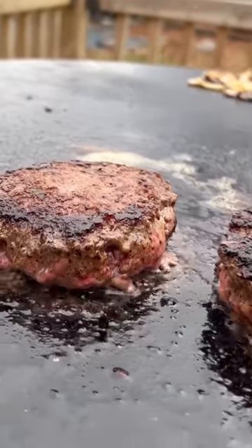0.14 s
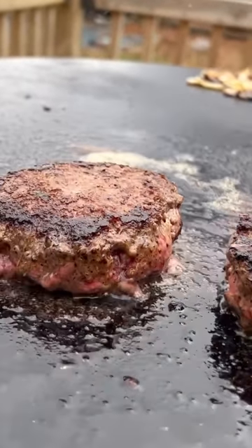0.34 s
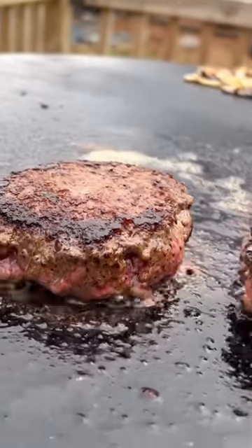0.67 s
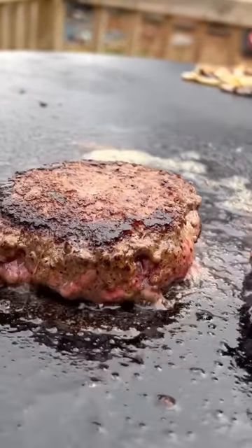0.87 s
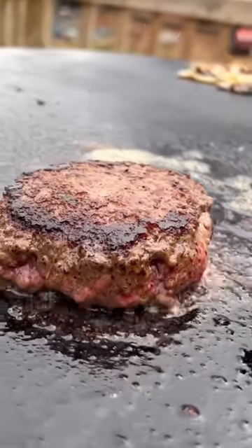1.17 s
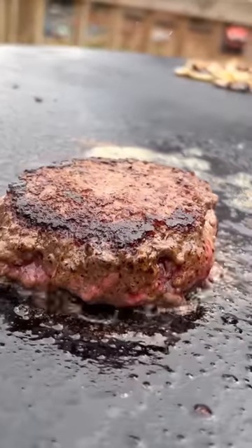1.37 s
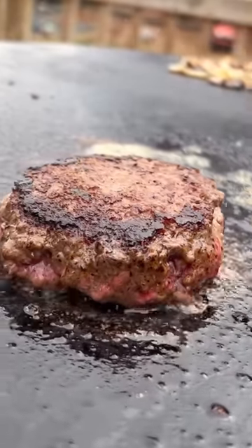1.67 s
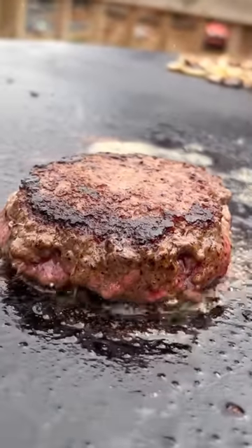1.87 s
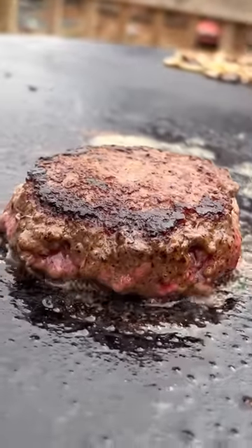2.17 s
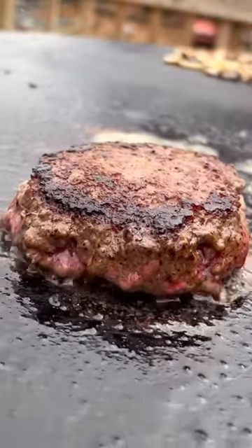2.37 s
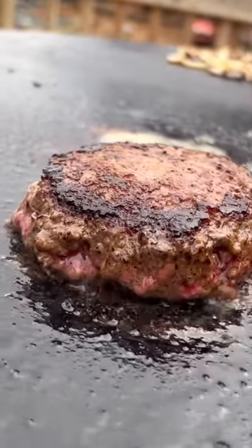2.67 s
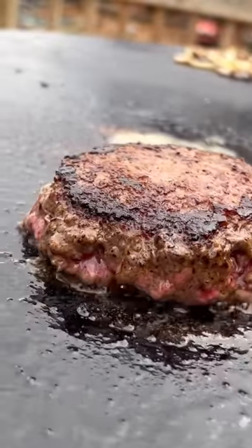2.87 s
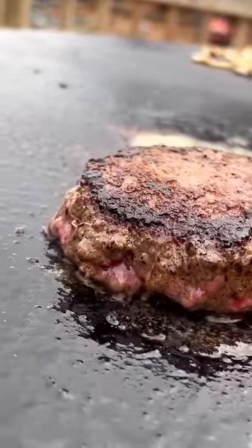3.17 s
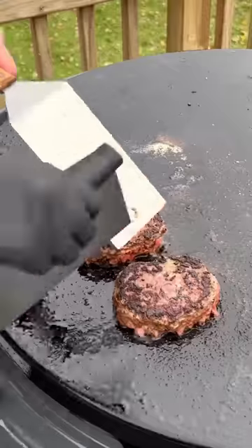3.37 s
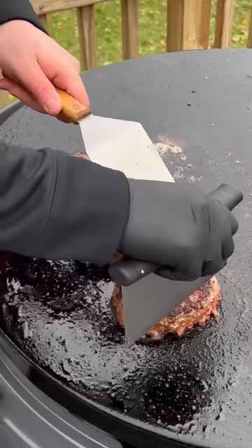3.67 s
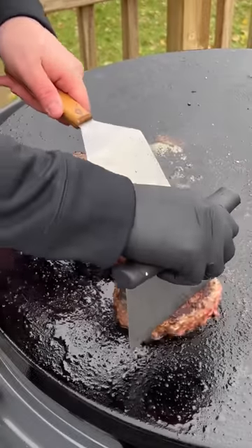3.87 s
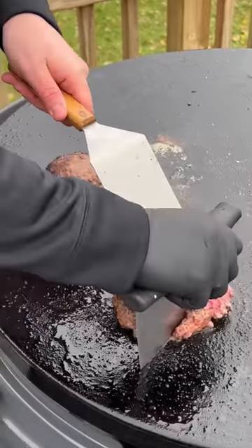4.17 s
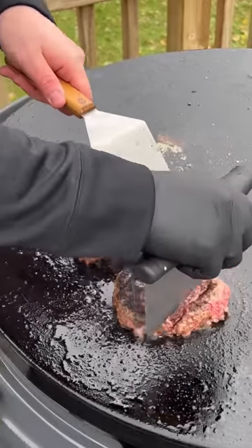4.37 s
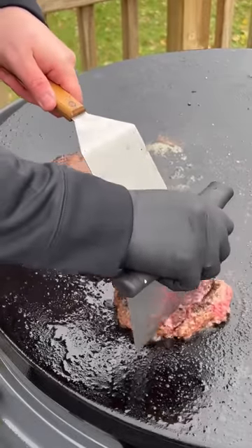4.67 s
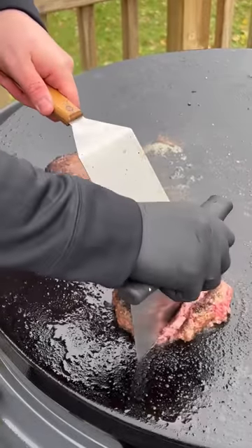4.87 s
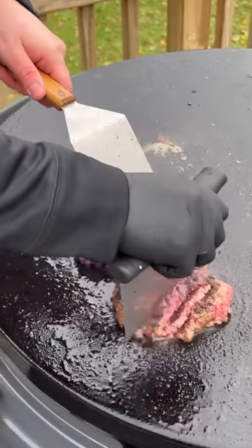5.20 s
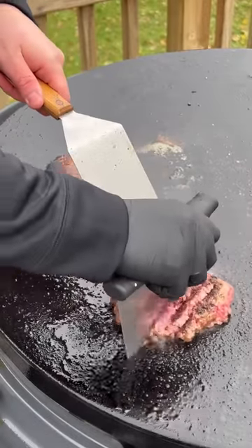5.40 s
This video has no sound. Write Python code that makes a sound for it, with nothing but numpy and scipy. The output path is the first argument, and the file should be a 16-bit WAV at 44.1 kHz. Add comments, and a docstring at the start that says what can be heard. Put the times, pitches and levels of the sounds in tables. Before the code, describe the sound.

Burger patties sizzle and spit loudly up close outdoors in gusty wind, then the sizzle drops farther off as a metal spatula scuffs and knocks the griddle.

```python
"""Burgers sizzle on a steel griddle outdoors, crackling and spitting very near the microphone at first.
The sizzle is dense random bubble bursts and hiss; bigger bubbles pop and plop, and fat droplets tick.
Gusts of low turbulence swell throughout, with eddies puffing and thumping at the microphone.
From about 3.3 s the sizzle drops back, heard from farther above, then turns to an even hiss as meat is pressed.
A spatula scuffs and ticks the plate near 4 s and knocks near 5.4 s: noise clank over decaying plate modes."""
import sys
import numpy as np
from scipy import signal
from scipy.fft import rfft, irfft
from scipy.io import wavfile
from scipy.ndimage import uniform_filter1d, minimum_filter1d

SR = 44100
rng = np.random.default_rng(int(sys.argv[2]) if len(sys.argv) > 2 else 0)


def dump(signal):
    """Clip the signal to [-1, 1] and save it as 16-bit WAV at the path in sys.argv[1]."""
    limited = np.clip(np.atleast_2d(signal).T, -1, 1)
    pcm = np.round(limited * 32767).astype(np.int16)
    wavfile.write(sys.argv[1], SR, pcm)


N = 244314
TIME = np.arange(N) / SR
HZ = np.fft.rfftfreq(N, 1 / SR)
SHARED = np.array([[1], [0]])  # a sound has two rows: what both ports hear, and what only the right one hears
EDGE_HZ = 15900  # upper band limit

# low turbulence of the breeze: (frequency [Hz], relative density [dB per Hz])
RUMBLE_COLOUR = [(20, -13), (35, -10.5), (55, -0.5), (75, -1), (130, -7), (200, -13.5), (400, -30),
                 (900, -38)]
# ragged turbulence of gusts and eddies: (frequency [Hz], relative density [dB per Hz])
EDDY_COLOUR = [(30, -11), (70, -1), (130, -1.5), (290, -0.5), (450, -7.5), (700, -14), (1200, -26),
               (2500, -79)]
# gusts swell and die away above a light steady air:
# (time of the crest [s], level before trims [dB], rise [s], fall [s])
GUST_CRESTS = [(0.46, -39.5, .1, 0.22), (0.73, -34.5, 0.087, .03), (1.68, -51, .12, .05),
               (1.98, -24.5, 0.051, 0.094), (2.15, -33, 0.09, 0.27), (2.82, -32, .02, .08),
               (2.91, -30.5, 0.04, 0.096), (3.24, -27.5, 0.063, 0.17), (3.92, -34, 0.12, .2),
               (4.24, -32, .02, 0.063), (4.4, -28, .1, .03), (4.57, -28.5, 0.084, 0.17),
               (4.93, -33, 0.095, 0.077), (5.14, -31.5, 0.15, 0.087), (5.29, -28, 0.054, .13),
               (5.499, -31, 0.034, 0.014)]
CALM_DB = -45.5  # the steady air between gusts, before trims
GUST_SHAPE = 1.58  # flanks of a gust, from pointed (1) to rounded (2)
# the hardest eddies: (time [s], size before trims [dB], thump relative to size before trims [dB], thump pitch [Hz])
HARD_EDDIES = [(1.953, -22.5, 3, 181), (1.984, -28, 0, 83), (2.108, -18, -5, 103), (2.195, -20, -11, 102),
               (2.429, -19, -19, 70), (2.902, -28, -1, 90), (2.963, -36, 8, 95), (3.201, -20.5, -12, 94),
               (3.23, -13, -9, 89.5), (3.258, -26, -12, 71), (3.735, -27, -3, 113), (3.905, -23, -7, 151),
               (4.218, -25.5, -5, 129), (4.278, -28, -17, 59), (4.39, -25.5, -9, 62),
               (4.555, -21, -25, 127), (4.581, -21.5, -9, 191), (4.645, -20, -22, 98),
               (4.864, -27, -14, 116), (5.133, -20, -8, 118), (5.166, -19, -23, 116),
               (5.23, -18.5, -24, 200), (5.241, -27, 9, 60.4)]
# lesser eddies ride on the gusts: how many a second, their size above the breeze and its scatter [dB]
EDDIES_PER_S, EDDY_DB, EDDY_SPREAD_DB = 17, -2, 0.5
# the thump of a lesser eddy: relative to its size before trims [dB], pitch [Hz], scatter of pitch [octaves]
THUMP_DB, THUMP_HZ, THUMP_SCATTER = -8, 131, 0.33
# the spatula meets the plate: (time [s], force [dB], fade time of the scuff [s])
SPATULA_KNOCKS = [(4.029, -10, 0.016), (4.05, -14.5, 0.065), (5.374, 3.5, .006), (5.377, 0, 0.0045),
                  (5.381, 1, 0.0026), (5.389, 3, 0.0036)]
# ringing of the plate and blade: (frequency [Hz], relative level [dB], t60 [s])
PLATE_MODES = [(487, 7.5, 0.32), (634, -1, 0.25), (681, 8, 0.23), (850, -1, 0.26), (991, 0, 0.3),
               (1162, 7, 0.3), (1277, 12.5, 0.42), (1350, 1, 0.17), (1482, 2, .3), (1660, 5, 0.26),
               (1660, 3, 0.3), (1717, 7.5, 0.33), (2350, 2, 0.34), (2640, 6.5, 0.32)]
# the dense, quickly damped clank of a blow: (frequency [Hz], relative density [dB per Hz])
CLANK_COLOUR = [(200, -5), (380, -13.5), (500, 1), (1100, 2.5), (1800, 1.5), (2600, -6.5), (3000, -7.5),
                (3400, -18), (7000, -21), (14000, -54)]
# the thin blade ticks against the plate: (time [s], ring level [dB], pitch [Hz], t60 [s])
BLADE_CONTACTS = [(4.222, -13.5, 2730, 0.013)]
# droplets of fat explode with a very sharp tick: (time [s], size before trims [dB])
FAT_SPITS = [(0.067, 2), (0.114, 3.5), (0.1315, -2.5), (.182, -2), (0.233, -2), (0.5728, -4), (0.714, 2),
             (0.745, 0.5), (1.506, -3.5), (1.727, -1.5)]
# the loudest bubbles: (time [s], size before trims [dB], ring pitch [Hz], plop relative to size before trims [dB])
BIG_BUBBLES = [(0.181, -7, 2340, -11), (0.355, -10, 4960, -26), (0.467, -10, 2940, -12),
               (0.592, -3.5, 2370, -22), (0.745, -3.5, 2860, -20), (0.765, -7.5, 5620, -22),
               (0.879, -8, 4900, -11), (0.922, -4, 2570, -20), (1.319, -11.5, 4690, -15),
               (1.366, -10, 4500, -14), (1.413, -7, 4660, -20), (1.49, -7.5, 4330, -22),
               (1.707, -13, 2830, -7), (1.719, -4, 4950, -30), (2.389, -9, 4500, -12),
               (2.592, -11, 4820, -25), (2.84, -6, 4900, -13), (2.847, -4, 4790, -26),
               (2.905, -5, 6630, -16.5), (3.08, -9.5, 4700, -13), (3.505, -10.5, 5960, -12),
               (3.583, -16, 2210, -24), (5.297, -15, 4850, -7)]
# lesser bubbles burst at random: how many a second at the median crackle,
# size above the untrimmed sizzle, scatter, and plop relative to size before trims [dB]
BUBBLES_PER_S, BUBBLE_DB, BUBBLE_SPREAD_DB, BUBBLE_PLOP_DB = 24, 10.5, 2.5, -19
# they come in two sizes: pitch of the small and of the large ones, share of large ones, scatter of pitch [octaves]
SMALL_HZ, LARGE_HZ, LARGE_SHARE, PITCH_SCATTER = 4870, 2650, 0.32, 0.22
# how hard the fat boils, as heard at the microphone: (time [s], level before trims [dB])
SIZZLE_LEVEL = [(0, -23.5), (.28, -24.5), (.35, -20.5), (.68, -22), (.89, -20.5), (1.27, -23), (1.41, -20),
                (1.6, -25.5), (1.98, -22.5), (2.86, -22), (3.24, -22.5), (3.29, -32), (3.5, -31),
                (3.66, -33), (3.96, -30.5), (4.03, -28), (4.4, -29.5), (5.54, -27)]
# colour of the sizzle from three places:
# (frequency [Hz], beside the patty [dB], right over it [dB], high above [dB]), each relative
PLACE_COLOUR = [(120, -11.5, -13.5, -41), (414, -15.5, -15, -11), (750, -9.5, -12, -8.5),
                (1540, -7, -10.5, -7), (1880, -2.5, -6, -6), (2410, -2.5, -4.5, -4), (3080, -1.5, -5, -6),
                (5170, -2.5, -2.5, -9), (6140, -7.5, -1.5, -7.5), (7740, -5.5, -0.4, -12.5),
                (8050, 2.5, -1, -5), (10600, 0, -3.5, -4), (11430, 3.5, 0.5, -0.5), (12500, 0, -1, -6),
                (16300, -3.5, -3.5, -3.5)]
# when each place is heard: (time [s], power share beside [0-1], share over [0-1], share above [0-1])
PLACE_SHARE = [(1.5, 0.16, 0.17, 0), (1.8, 0.0017, 0.98, 0), (3.24, 0.0016, 0.9, 0),
               (3.28, 0.014, 0.08, 0.78)]
# free fat crackles; pressed meat hisses more evenly: (time [s], crackle relative to the fizz [dB])
CRACKLE_LEVEL = [(0, -4), (.3, -3.5), (1.6, -5.5), (3.2, -3), (3.6, -4.5), (4.0, -11), (5.5, -19)]
# the two microphone ports: (frequency [Hz], likeness [0-1], lead of the right port [rad])
PORT_LIKENESS = [(61, 1, 0), (298, 0.96, 0), (1000, 0.69, 0), (1540, 0.58, 0.36), (1570, 1, 0),
                 (5145, 1, 0), (5260, 0.78, 1), (6960, 0.74, 1.27), (11700, 0.96, 1.43),
                 (15500, 0.34, 1.78)]


def gain_of(db):
    """Decibels to gain."""
    return 10 ** (np.asarray(db) / 20)


def evened(x):
    """Scales to rms 1."""
    return x / np.sqrt(np.mean(x ** 2) + 1e-20)


def follow(rows, axis=1):
    """One column of a curve at every sample."""
    rows = np.array(rows, float)
    return np.interp(TIME, rows[:, 0], rows[:, axis])


def read(rows, axis=1):
    """One column of a spectrum at every frequency, drawn over log frequency."""
    rows = np.array(rows, float)
    return np.interp(np.log(HZ + 1), np.log(rows[:, 0]), rows[:, axis])


def tint(x, db):
    """Causal minimum-phase filter with the given spectrum; white noise keeps its power."""
    log_gain = np.log(evened(gain_of(db)))
    mirrored = np.r_[log_gain, log_gain[-2:0:-1]]
    phase = -signal.hilbert(mirrored).imag[:len(HZ)]
    taps = irfft(np.exp(log_gain + 1j * phase), N)[:4096]
    return signal.oaconvolve(x, taps[None], axes=1)[:, :N]


def add(mix, s, sound):
    """Adds a sound at time s."""
    part = mix[:, max(round(s * SR), 0):][:, :sound.shape[-1]]
    part += sound[..., :part.shape[1]]


def wander(rate_hz):
    """Slow random drift of rms 1, mostly below the given rate."""
    spectrum = rfft(rng.standard_normal(N)) / (1 + (HZ / rate_hz) ** 4)
    return evened(irfft(spectrum, N))


def swell(u):
    """Rises to 1 at u = 1, then dies away."""
    return u * np.exp(1 - u)


def bell(u):
    """Turns even chance from 0 to 1 into a bell-shaped scatter between -2 and 2."""
    return np.clip(.5 * np.log((u + 1e-9) / (1 - u)), -2, 2)


def port_phase():
    """What the right port hears on its own has a random phase."""
    return np.array([[0], [rng.uniform(0, 2 * np.pi)]])


def breeze_db():
    """Strength of the breeze: steady air plus gusts that grow to a crest and fade."""
    power = gain_of(CALM_DB) ** 2
    for s, db, rise_s, fall_s in GUST_CRESTS:
        away = abs(np.maximum((s - TIME) / rise_s, (TIME - s) / fall_s))
        power = power + gain_of(db) ** 2 * np.exp(-2 * np.minimum(away ** GUST_SHAPE, 20))
    return 10 * np.log10(power)


def breeze(rumble_db=-0.5, flutter_db=3, follow_gusts=0.95, gust_db=-41, lumpy_db=-0.5):
    """Low turbulence at the ports, with a fluttering, wider-band turbulence that follows the gusts."""
    level_db = breeze_db()
    rumble = tint(rng.standard_normal((2, N)), read(RUMBLE_COLOUR))
    rumble = rumble / np.sqrt(uniform_filter1d(rumble ** 2, size=2000, axis=1) + 1e-9)
    lumps_db = lumpy_db * np.tanh(wander(rate_hz=10.6))
    rumble = gain_of(level_db + rumble_db + lumps_db) * rumble
    push = gain_of(gust_db + follow_gusts * (level_db - np.percentile(level_db, 90)))
    push = push * gain_of(flutter_db * wander(rate_hz=52))
    return rumble + tint(push * rng.standard_normal((2, N)), read(EDDY_COLOUR))


def lesser_eddies():
    """Random eddies as rows like HARD_EDDIES, sized by the breeze that carries them."""
    moment, chance, size, pitch = rng.random((200, 4)).T
    at = (moment * (N - 1)).astype(int)
    db = breeze_db()[at] + EDDY_DB + EDDY_SPREAD_DB * bell(size)
    hz = THUMP_HZ * 2 ** (THUMP_SCATTER * bell(pitch))
    rows = np.column_stack([TIME[at], db, np.full(len(at), THUMP_DB), hz])
    return list(rows[chance < EDDIES_PER_S * TIME[-1] / len(at)])


def eddies(puff_db=-4.5, puff_s=0.0055, thump_db=-1, thump_cycles=0.79):
    """An eddy hits the ports: a ragged puff and one low swing of pressure."""
    out, t = np.zeros((2, N)), np.arange(4000) / SR
    turbulence = tint(rng.standard_normal((2, N)), read(EDDY_COLOUR))
    rise = swell(t / puff_s)
    for s, db, low_db, hz in HARD_EDDIES + lesser_eddies():
        swirl = turbulence.take(round(s * SR) + np.arange(len(t)), axis=1, mode="wrap")
        puff = evened(swirl * rise) * np.sqrt(np.mean(rise ** 2))
        thump = np.sin(2 * np.pi * hz * t + port_phase()) * swell(t * hz / thump_cycles)
        add(out, s, gain_of(db) * (gain_of(puff_db) * puff + gain_of(thump_db + low_db) * thump))
    return out


def blade_ticks(snap_db=-2, snap_s=.0004):
    """A snap of contact and one quickly damped mode of the steel blade."""
    out, t = np.zeros((2, N)), np.arange(3000) / SR
    for s, db, hz, t60 in BLADE_CONTACTS:
        ring = np.exp(-np.log(1000) * t / t60) * np.sin(2 * np.pi * hz * t)
        snap = gain_of(snap_db) * rng.standard_normal((2, len(t))) * np.exp(-t / snap_s)
        add(out, s, gain_of(db) * (SHARED * ring + snap))
    return out


def spatula(ring_db=-41, clank_db=-18, tail_db=-29, tail_s=0.059):
    """The blade chatters onto the plate: a short clank, the plate's modes and a dense dying ring."""
    blow_power, scuff_power = np.zeros((1, N)), np.zeros((1, N))
    t = np.arange(SR // 2) / SR
    for s, force_db, scuff_s in SPATULA_KNOCKS:
        fade = gain_of(clank_db) * np.exp(-t / scuff_s) + gain_of(tail_db) * np.exp(-t / tail_s)
        add(scuff_power, s, (gain_of(force_db) * fade) ** 2)
        add(blow_power, s, np.array([gain_of(force_db) ** 2]))
    out = tint(np.sqrt(scuff_power) * rng.standard_normal((2, N)), read(CLANK_COLOUR))
    for hz, db, t60 in PLATE_MODES:
        # every blow feeds energy into the mode, and it leaks away
        leak = np.exp(-2 * np.log(1000) / (t60 * SR))
        energy = signal.lfilter([1], [1, -leak], blow_power)
        tone = np.sin(2 * np.pi * (hz * TIME + rng.random((2, 1))))
        out += gain_of(ring_db + db) * np.sqrt(energy) * tone
    return out


def spits(tick_hz=11500, tick_s=0.00059, click_s=.00004, click_db=-3):
    """Water flashes to steam inside a droplet: a wide click and a few cycles of very high ringing."""
    out, t = np.zeros((2, N)), np.arange(96) / SR
    fade = gain_of(click_db) * (np.exp(-t / click_s) + np.exp(-t / tick_s))
    for s, db in FAT_SPITS:
        jitter = np.cumsum(rng.normal(0, 0.63, len(t)))  # the tearing film has no steady pitch
        add(out, s, gain_of(db) * fade * np.cos(2 * np.pi * tick_hz * t + jitter + port_phase()))
    return out


def bubbles():
    """Lesser bubbles as rows like BIG_BUBBLES: frequent in freely crackling fat, sized by the sizzle."""
    moment, chance, size, kind, pitch, depth = rng.random((400, 6)).T
    at = (moment * (N - 1)).astype(int)
    crackle_db = follow(CRACKLE_LEVEL)
    freely = gain_of(crackle_db - np.median(crackle_db))[at]
    db = follow(SIZZLE_LEVEL)[at] + BUBBLE_DB + BUBBLE_SPREAD_DB * bell(size)
    hz = np.where(kind < LARGE_SHARE, LARGE_HZ, SMALL_HZ) * 2 ** (PITCH_SCATTER * bell(pitch))
    plop_db = BUBBLE_PLOP_DB + BUBBLE_SPREAD_DB * bell(depth)
    rows = np.column_stack([TIME[at], db, hz, plop_db])
    return list(rows[chance < BUBBLES_PER_S * freely * TIME[-1] / len(at)])


def pops(ring_s=0.0002, snap_s=0.00072, ring_db=-3, snap_db=-7, plop_db=3, plop_hz=3500,
         sag_s=0.000926, plop_s=0.00058):
    """A big bubble tears with a snap and a brief ring; a plop sags in pitch as its cavity opens."""
    out, t = np.zeros((2, N)), np.arange(400) / SR
    sagging_hz = plop_hz / (1 + (t / sag_s) ** 2)
    plop = np.sin(2 * np.pi * np.cumsum(sagging_hz) / SR) * swell(t / plop_s)
    tearing = rng.standard_normal((2, N + len(t)))
    for s, db, hz, low_db in BIG_BUBBLES + bubbles():
        ring = gain_of(ring_db) * np.sin(2 * np.pi * hz * t) * swell(t / ring_s)
        snap = gain_of(snap_db) * tearing[:, round(s * SR):][:, :len(t)] * np.exp(-t / snap_s)
        add(out, s, gain_of(db) * (snap - SHARED * (ring + gain_of(plop_db + low_db) * plop)))
    return out


def bursts(per_s, spread_db, pitches_hz, decay_s):
    """Bubbles of random size burst at random; each rings briefly, at a random phase in the right-only row."""
    count = len(pitches_hz)
    chance, size, kind, side = rng.random((4, N))
    phase = rng.uniform(0, 2 * np.pi, (count, 1))
    at = np.flatnonzero(chance < per_s / SR)
    t = np.arange(96) / SR
    rings = np.exp(-t / decay_s + 1j * (2 * np.pi * pitches_hz[:, None] * t + phase))
    # many small bursts, few large ones
    heights = gain_of(spread_db * np.minimum(-np.log(1 - size[at]), 3.9))
    grains = heights[:, None] * rings[(kind[at] * count).astype(int)]
    turned = grains * np.exp(2j * np.pi * side[at, None])
    where = (at[:, None] + np.arange(len(t))).ravel()
    rows = [np.bincount(where, g.real.ravel(), N)[:N] for g in (grains, turned)]
    return evened(np.array(rows))


def sizzle(hiss_db=-2, flurry_db=0.65, sputter_db=-0.04, level_db=3.0):
    """Fine fizz, sparser crackle and a smooth steam hiss, all coming in flurries."""
    pitches_hz = np.linspace(300, 17000, num=64)
    fizz = bursts(per_s=6500, spread_db=3.5, pitches_hz=pitches_hz, decay_s=0.00025)
    crackle = bursts(per_s=380, spread_db=5, pitches_hz=pitches_hz, decay_s=.00005)
    hiss = gain_of(hiss_db) * rng.standard_normal((2, N))
    fat = fizz + gain_of(follow(CRACKLE_LEVEL)) * crackle + hiss
    fat = fat * gain_of(flurry_db * wander(rate_hz=15.0) + sputter_db * wander(rate_hz=300))
    # even out the slow swells, so that the level curve sets them
    fat = fat / np.sqrt(uniform_filter1d((fat ** 2).mean(0), size=4000))
    heard = np.zeros((2, N))
    for column in range(1, len(PLACE_COLOUR[0])):
        share = np.clip(follow(PLACE_SHARE, axis=column), 0, 1)
        heard += np.sqrt(share) * tint(fat, read(PLACE_COLOUR, axis=column))
    return gain_of(follow(SIZZLE_LEVEL) + level_db) * heard


def ports(pair):
    """Two close ports hear nearly the same in the bass; in the treble the right one leads."""
    shared, own = rfft(pair, axis=1)
    same = np.clip(read(PORT_LIKENESS), 0, 1)
    lead = np.exp(1j * read(PORT_LIKENESS, axis=2))
    right = (same * shared + np.sqrt(1 - same ** 2) * own) * lead
    return irfft(np.array([shared, right]), N, axis=1)


def scene():
    """Breeze, spatula and griddle at the microphone."""
    air = breeze() + eddies()
    steel = blade_ticks() + spatula()
    fat = spits() + pops() + sizzle()
    return ports(air + steel + fat)


def record(dry, limit_db=-2.5, recover_db_per_s=700, low_cut_hz=38):
    """Low cut; a fast limiter catches the sharpest peaks, holds 8 ms and recovers; then the band limit."""
    low_cut = signal.butter(2, low_cut_hz, "high", fs=SR, output="sos")
    dry = signal.sosfilt(low_cut, dry)
    over_db = np.maximum(20 * np.log10(abs(dry).max(0) + 1e-9) - limit_db, 0)
    held_db = -minimum_filter1d(-over_db, size=351, origin=170)
    fall_db = TIME * recover_db_per_s
    duck_db = np.maximum.accumulate(held_db + fall_db) - fall_db
    limited = dry / gain_of(uniform_filter1d(duck_db, size=8))
    band_limit = signal.firwin(401, EDGE_HZ, window=("kaiser", 9), fs=SR)
    return signal.oaconvolve(limited, band_limit[None], "same")


dry = scene()
out = record(dry)
dump(out)
```